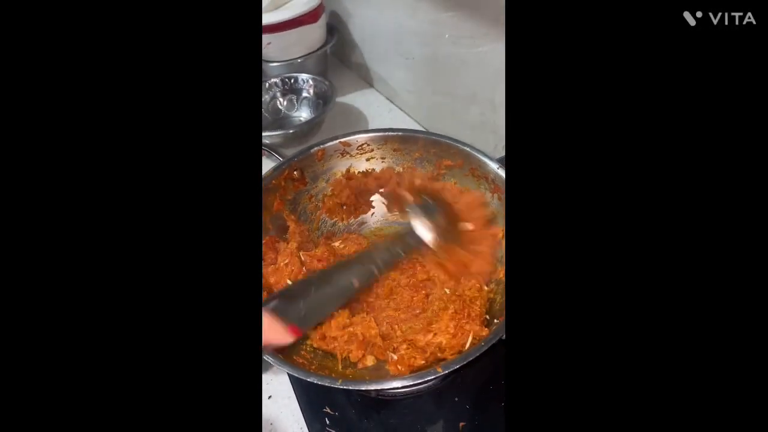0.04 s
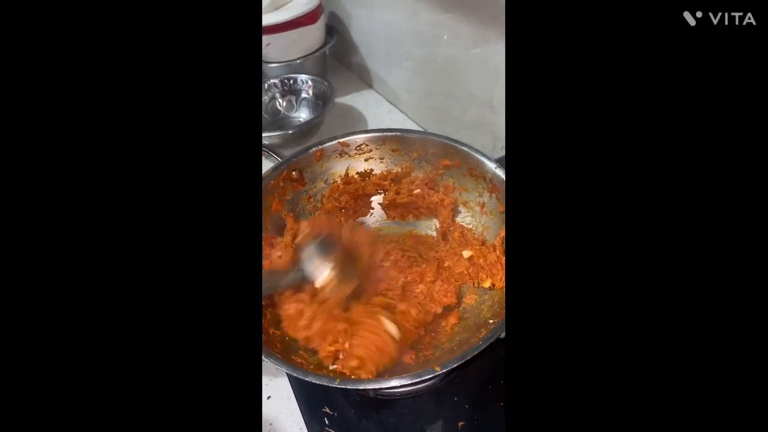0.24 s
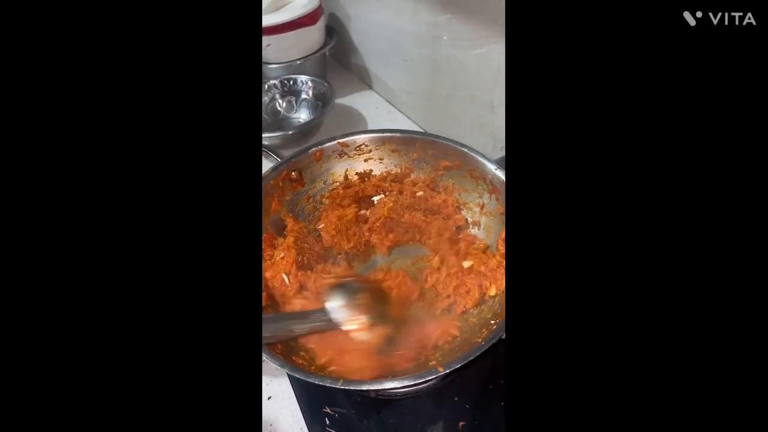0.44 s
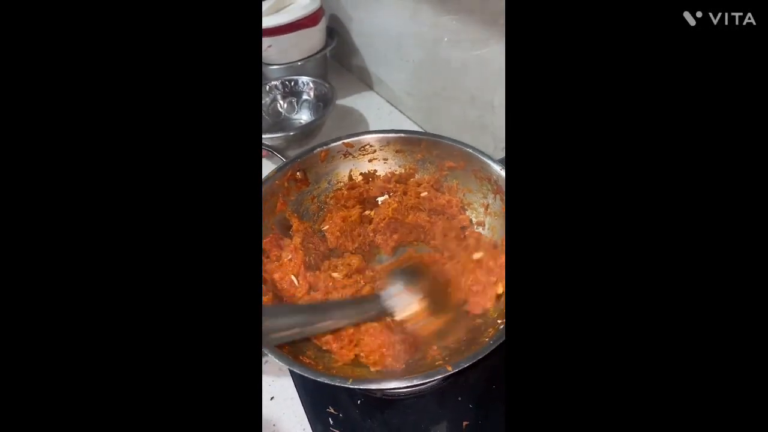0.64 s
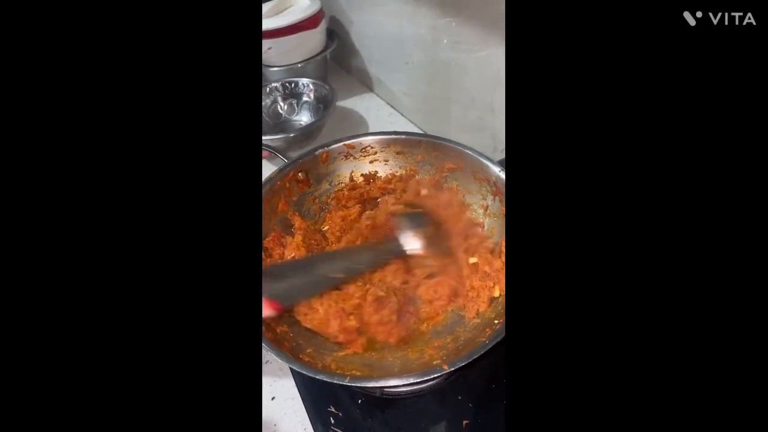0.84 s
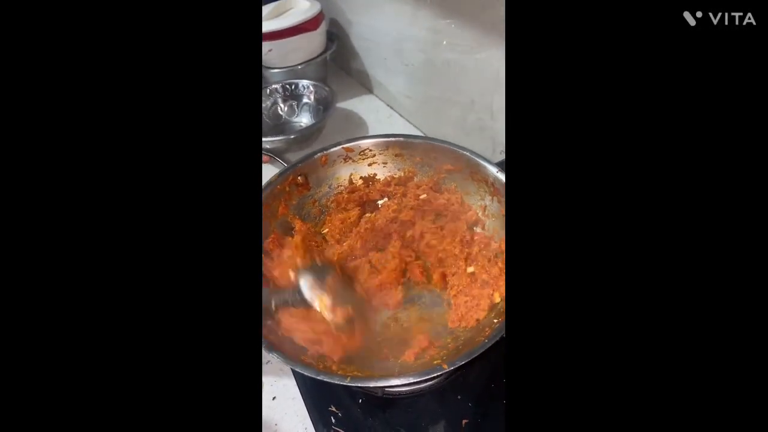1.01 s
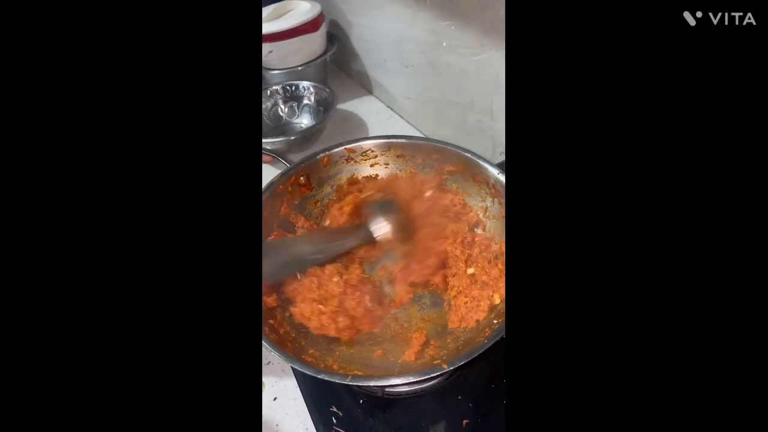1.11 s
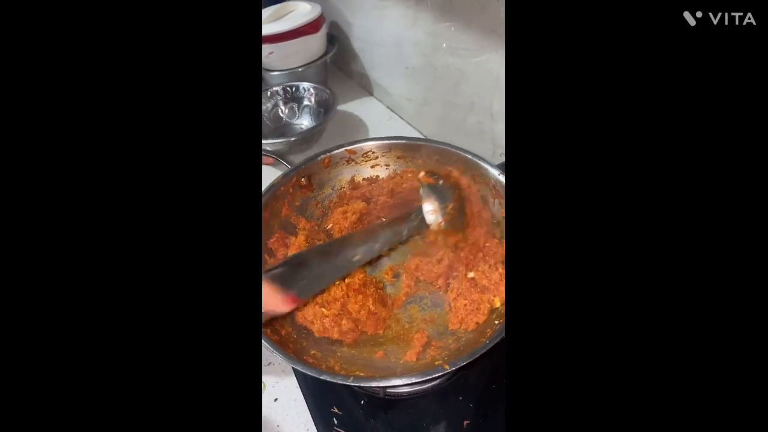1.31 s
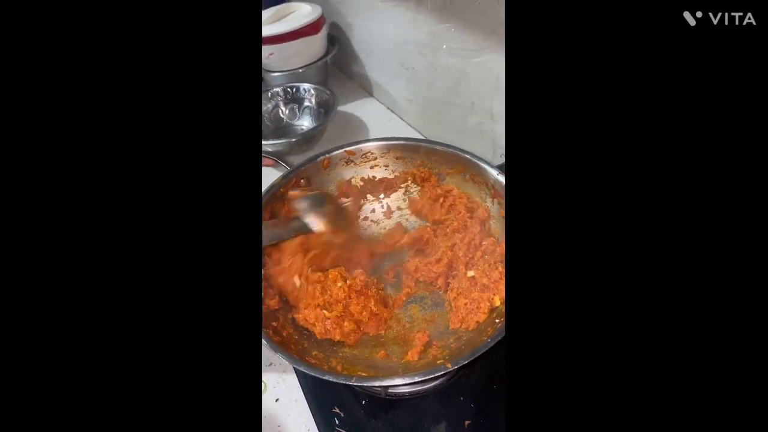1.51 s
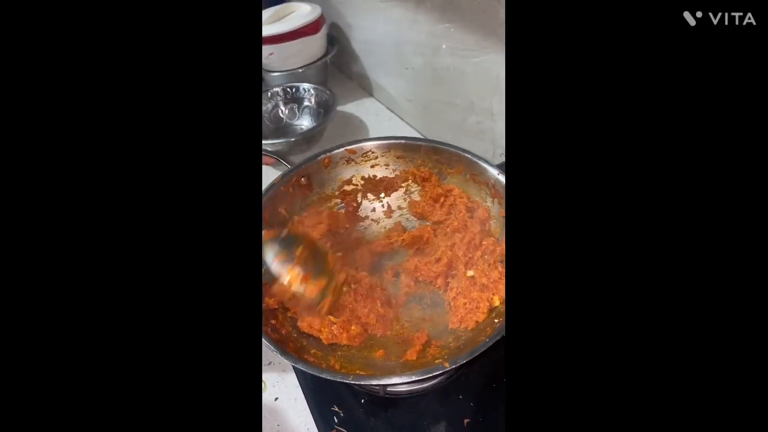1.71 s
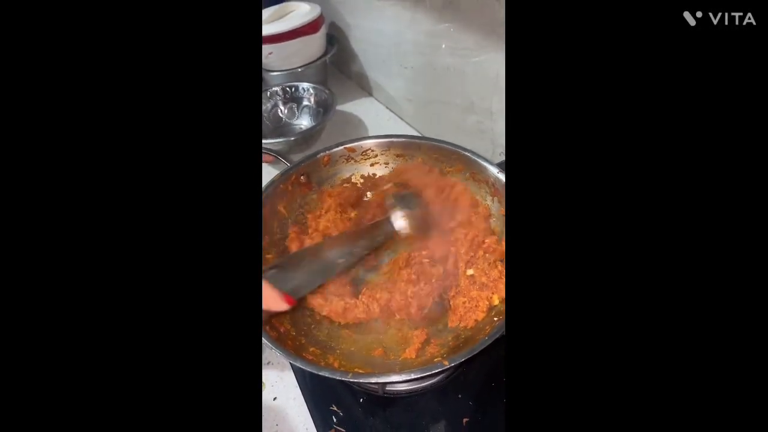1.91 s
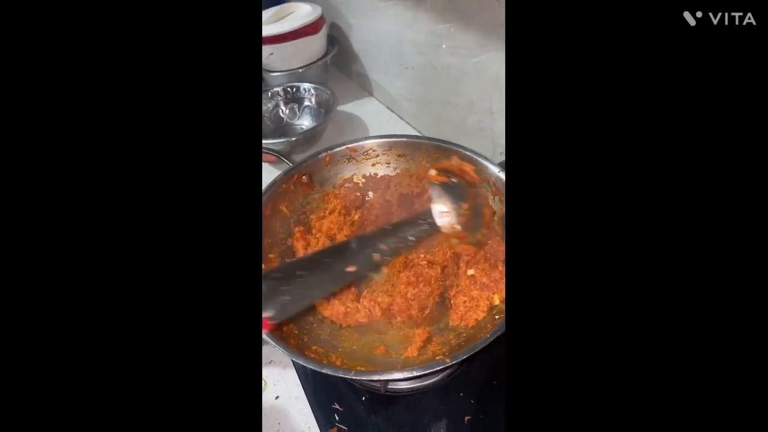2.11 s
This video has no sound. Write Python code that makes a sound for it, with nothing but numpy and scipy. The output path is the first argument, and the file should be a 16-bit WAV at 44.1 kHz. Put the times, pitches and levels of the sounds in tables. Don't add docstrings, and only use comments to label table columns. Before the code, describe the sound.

A metal ladle stirs thick food in a steel pan, close up in stereo: an early hard clank, uneven scrapes and soft drags, then another sharp knock near the end, over faint sizzling and low kitchen rumble.

```python
import sys
import numpy as np
from scipy import signal
from scipy.fft import rfft, irfft, next_fast_len
from scipy.io import wavfile
from scipy.ndimage import uniform_filter1d

SR = 44100
rng = np.random.default_rng(int(sys.argv[2]) if len(sys.argv) > 2 else 0)


def voltage_ratio(level):
    return 10 ** (np.asarray(level, float) / 20)


def output_pcm(signal):
    pcm = np.clip(np.atleast_2d(signal).T, -1, 1) * 32767
    wavfile.write(sys.argv[1], SR, np.round(pcm).astype(np.int16))


N = 94815


def evened(x):
    return x / np.sqrt(np.mean(x ** 2) + 1e-20)


def read(points, hz):
    f, value = np.transpose(points)
    return np.interp(np.log(hz + 1), np.log(f + 1), value)


def band(x, lo_hz, hi_hz):
    sos = signal.butter(3, [lo_hz, min(hi_hz, 20000)], "band", fs=SR, output="sos")
    return signal.sosfilt(sos, x)


def resonate(x, hz, width_hz):
    pole = np.exp((2j * hz - width_hz) * np.pi / SR)
    return signal.lfilter([1], [1, -pole], x)


def chatter(per_s, spread_db, lump_s, lump_db):
    slips = rng.standard_normal(N)
    slips *= voltage_ratio(spread_db * np.minimum(rng.exponential(1, N), 4))
    slips *= rng.random(N) < per_s / SR
    lumps = evened(uniform_filter1d(rng.standard_normal(N), round(lump_s * SR) + 1))
    return evened(slips * voltage_ratio(lump_db * lumps))


# time in seconds, level in dB.
RUMBLE = [(0, -46), (.12, -49.5), (.25, -41.5), (.45, -56.5), (.55, -40.5), (.75, -36.5), (.85, -44.5),
          (0.949, -46.5), (1.3, -55.5), (1.45, -42.5), (1.65, -57), (2.15, -50.5)]


def rumble():
    level = np.interp(np.arange(N) / SR, *np.transpose(RUMBLE))
    return voltage_ratio(level) * evened(band(rng.standard_normal((2, N)), 38, 127))


def fan():
    drone = resonate(rng.standard_normal((2, N)), 160, 4.7).real
    return voltage_ratio(-60) * evened(drone)


# frequency in Hz, level in dB per Hz.
SIZZLE = [(25, -7.5), (70, -5.5), (400, -20), (1800, -21.5), (3100, -18), (6300, -23.5), (9800, -14),
          (15500, -22.5)]


def sizzle():
    frames, hz = N // 256 + 5, np.fft.rfftfreq(1024, 1 / SR)
    a, b, c, d, patches = rng.standard_normal((frames, 513, 5)).T
    patches = evened(uniform_filter1d(uniform_filter1d(patches, 12, 0), 10, 1))
    color = voltage_ratio(read(SIZZLE, hz)[:, None] + 2.3 * patches)
    z = np.array([a + 1j * b, c + 1j * d]) * color
    hiss = evened(signal.istft(z, nperseg=1024, noverlap=768)[1][:, :N])

    pops = evened(band(chatter(900, 10.4, lump_s=0.011, lump_db=-3.0), 4500, 15000))
    pops = np.array([pops, np.roll(pops, 40)])

    r, w = np.exp(-np.pi * 25 / SR), 2 * np.pi * MODES_PAN[0][0] / SR
    hum = signal.lfilter([1, -1], [1, -2 * r * np.cos(w), r * r], rng.standard_normal((2, N)))
    return voltage_ratio(-41) * hiss + voltage_ratio(-74) * pops + voltage_ratio(-60) * evened(hum)


# start in seconds, fade in seconds, low edge in Hz, high edge in Hz.
SNAPS = [
    (.043, .004, 5000, 16000),
    (.2164, .003, 600, 9000),
    (.918, .003, 9000, 13000),
    (1.381, .004, 700, 13000),
    (1.72, .012, 450, 2300),
    (1.765, .003, 8000, 13000),
    (1.83, .004, 450, 2300),
    (2.022, .01, 500, 1000),
]
SNAP_DB = [-39, -18, -24, -29.5, -40, -35, -15.5, -37.5]


def snaps():
    out, t = np.zeros((2, N)), np.arange(3000) / SR
    noises = rng.standard_normal((len(SNAPS), 2, 3000))
    for (s, fade_s, lo_hz, hi_hz), db, noise in zip(SNAPS, SNAP_DB, noises):
        puff = evened(band(noise, lo_hz, hi_hz)) * np.exp(-t / fade_s)
        out[:, round(s * SR):][:, :3000] += voltage_ratio(db) * puff
    return out


# start in seconds, length in seconds, pitch in Hz.
CATCHES = [(.2164, .02, 750), (.2164, .006, 2130), (.2164, .008, 3330), (.251, .012, 5200),
           (.278, .006, 1800), (.288, .011, 1820), (.288, .009, 3100), (.335, .035, 3000),
           (.345, .022, 760), (.535, .02, 3650), (.549, .03, 2900), (.552, .022, 1700), (.59, .027, 1700),
           (.55, .05, 750), (.752, .035, 1800), (.81, .01, 3300), (.821, .004, 1900), (.829, .01, 1800),
           (.829, .007, 3200), (.844, .042, 3250), (.844, .016, 5100), (.844, .025, 1800),
           (1.053, .019, 3800), (1.078, .011, 2900), (1.088, .015, 3300), (1.075, .012, 1750),
           (1.091, .007, 1800), (1.058, .016, 1150), (1.476, .012, 1700), (1.72, .02, 620),
           (1.83, .012, 620), (1.83, .02, 5700), (1.838, .032, 3200), (1.87, .08, 3200),
           (.2164, .007, 1420), (.2164, .007, 1190), (.83, .009, 11300), (.843, .005, 11000),
           (.821, .003, 11000), (1.093, .004, 11500), (.288, .006, 11000), (1.21, .03, 290),
           (1.38, .008, 800), (.625, .04, 540), (1.414, .02, 800), (1.17, .02, 750), (.888, .03, 450)]
CATCH_DB = [-26.5, -21.5, -48, -34, -32, -26.5, -26.5, -34.5, -35.5, -33, -31, -33, -38.5, -39.5, -30.5,
            -23, -22, -19.5, -23, -27.5, -41, -42, -28.5, -21, -24, -38, -27, -29, -43, -40.5, -23, -36,
            -30, -46, -15, -18, -17, -22, -24, -23, -27, -36, -35, -30, -32, -40, -37]


def catches():
    out, t = np.zeros((2, N)), np.arange(6000) / SR
    noises = rng.standard_normal((len(CATCHES), 6000))
    for (s, length_s, hz), db, slips in zip(CATCHES, CATCH_DB, noises):
        bite = 7.3 * (t == 0)
        grip = (slips + bite) * voltage_ratio(-5.5 * t / length_s) * (t < length_s)
        width_hz = 49.6 + 0.067 * hz
        sing = resonate(resonate(grip, hz, width_hz), hz, 2 * width_hz)
        sing = voltage_ratio(db) * sing / np.sqrt(np.sum(abs(sing) ** 2) / (2 * length_s * SR))
        part = out[:, round(s * SR):][:, :6000]
        part += np.array([sing.real, sing.imag])[:, :part.shape[1]]
    return out


BOWL_HZ = 394
# frequency in Hz, level in dB, t60 in seconds.
MODES_PAN = [(292.2, 6.5, 0.2), (318.5, -2.5, 0.29), (599.5, -5, 0.13), (680, 3, 0.067), (768.3, -1, 0.13),
             (1232, -6, 0.11), (1415, -15.5, 0.052), (1764, -0.5, 0.017), (2890, 1, 0.046),
             (3269, -0.5, 0.11), (3860, -65, 0.062), (4900, -75, 0.0078), (8860, -20, 0.29),
             (10500, 11, 0.005)]
# frequency in Hz, level in dB per Hz.
SHEET = [(100, -41), (300, -12), (1500, -18.5), (2400, -18.5), (3200, -29.5), (5500, -15.5), (10800, -3.5),
         (15500, -26)]
# frequency in Hz, t60 in seconds.
SHEET_T60 = [(200, 0.4), (1500, 0.13), (10000, 0.041)]


def pan_ring():
    t = np.arange(8192) / SR
    clear = 0
    for hz, db, t60 in MODES_PAN:
        local = hz > BOWL_HZ
        level = voltage_ratio(db + 5.0 * rng.uniform(-1.16, 1) * local - 60 * t / t60)
        pitch = hz * (1 + rng.uniform(-.025, .025) * local)
        phase = rng.random((2, 1)) * [[0], [1]]
        clear = clear + level * np.sin(2 * np.pi * (pitch * t + phase))
    hz, s, z = signal.stft(rng.standard_normal((2, 8192)), SR, nperseg=128)
    decay = voltage_ratio(read(SHEET, hz)[:, None] - 60 * s / read(SHEET_T60, hz)[:, None])
    crowd = signal.istft(z * decay, SR, nperseg=128)[1][:, :8192]
    ring = (clear + voltage_ratio(25.0) * crowd) * (1 + 1.44 * np.exp(-t / 0.00066))
    return ring / np.linalg.norm(ring[0])


def stroke(start, hardest, end, db):
    t, edge_db, release_s = np.arange(N) / SR, -6.5, .035
    level = np.interp(t, [start, hardest, end, end + release_s], [edge_db, 0, edge_db, edge_db - 54.0])
    touching = (t >= start) * (t < end + release_s)
    return uniform_filter1d(voltage_ratio(db + level) * touching, size=150)


def strokes(slides, levels, column):
    return sum(stroke(*row, db[column]) for row, db in zip(slides, levels))


# start in seconds, soft thud in dB, clank in dB, edge tick in dB.
KNOCKS = [(0.02, -38.5, -31.5, -36), (0.042, -53, -32.5, -32.5), (0.12, -32, -34.5, -69),
          (0.199, -31, -21, -47), (0.2164, -8, -4.5, -22), (0.286, -54, -26, -52.5),
          (0.434, -33, -28.5, -40.5), (.501, -21.5, -26.5, -38), (0.609, -18, -30, -52),
          (0.743, -19, -19.5, -43), (0.81, -43, -22.5, -24), (0.92, -36, -43, -35), (1, -27.5, -26.5, -51),
          (1.204, -29, -33, -41), (1.369, -33.5, -63, -42), (1.381, -26.5, -27.5, -43),
          (1.413, -24.5, -36.5, -59), (1.475, -30, -31, -40.5), (1.495, -26.5, -31.5, -62),
          (1.72, -33.5, -41, -62), (1.765, -68, -64, -45), (1.83, -9, -10, -16), (1.84, -48, -23.5, -17),
          (2.023, -28, -48, -46)]
# start, hardest moment and end, all in seconds.
DRAGS = [(0, .01, .05), (.25, .27, .39), (.43, .445, .47), (.50, .515, .59), (.605, .64, .70),
         (.74, .76, .82), (.875, .90, .92), (1.0, 1.028, 1.05), (1.05, 1.07, 1.12), (1.16, 1.225, 1.245),
         (1.39, 1.42, 1.455), (1.47, 1.505, 1.52), (1.85, 1.865, 1.96), (2.02, 2.04, 2.12)]
# bowl in dB, wall in dB.
DRAG_DB = [(-38.5, -36), (-39.5, -33.5), (-45.5, -33.5), (-46, -30.5), (-26, -24.5), (-27.5, -23.5),
           (-32, -31), (-24.5, -29), (-31, -25.5), (-35, -38.5), (-31, -32), (-31, -46), (-38, -35.5),
           (-47, -64)]
# start, hardest moment and end, all in seconds.
SCRAPES = [(.24, .255, .285), (.28, .31, .36), (.515, .55, .58), (.575, .60, .67), (.74, .755, .81),
           (.785, .835, .885), (1.0, 1.015, 1.045), (1.046, 1.056, 1.082), (1.072, 1.094, 1.118),
           (1.83, 1.838, 1.87), (1.40, 1.44, 1.51), (1.11, 1.13, 1.23), (.828, .833, .838), (.66, .70, .74),
           (.89, .93, 1.0)]
# clank in dB, edge in dB.
SCRAPE_DB = [(-20, -25.5), (-27, -26), (-31, -34.5), (-27, -33), (-24.5, -36), (-22.5, -27.5), (-29.5, -41),
             (-20.5, -25), (-20, -28.5), (-25.5, -26.5), (-43.5, -56), (-42, -47.5), (-24, -14.5),
             (-37, -43), (-38.5, -38.5)]


def ladle():
    soft, clank, edge = np.zeros((3, N))
    touches = rng.standard_normal((len(KNOCKS), 400)) * np.exp(-np.arange(400) / SR / .0009)
    touches[:, 0] += 5
    for (s, soft_db, clank_db, edge_db), flurry in zip(KNOCKS, touches):
        at = round(s * SR)
        flurry = flurry / np.linalg.norm(flurry)
        soft[at] += voltage_ratio(soft_db + 23.5)
        clank[at:at + 400] += voltage_ratio(clank_db + 29.5) * flurry
        edge[at:at + 400] += voltage_ratio(edge_db + 29.5) * flurry

    lumps = voltage_ratio(2.0) * chatter(2500, 6.1, lump_s=0.0032, lump_db=2.0)
    bowl = lumps * strokes(DRAGS, DRAG_DB, 0)
    wall = lumps * strokes(DRAGS, DRAG_DB, 1)

    slips = chatter(20000, 2.0, lump_s=.003, lump_db=2.0)
    hard = voltage_ratio(8.5) * slips * strokes(SCRAPES, SCRAPE_DB, 0)
    edge += voltage_ratio(4.5) * slips * strokes(SCRAPES, SCRAPE_DB, 1)

    push = band(soft, 251, 850) + band(clank, 685, 3270)
    push += band(bowl, 233.5, BOWL_HZ) + band(wall, BOWL_HZ, 1666)
    push += band(hard, 1450, 5000) + band(edge, 5000, 17000) + 0.089 * band(edge, 1900, 5000)

    spot = np.arange(N) / SR / .037
    out = np.zeros((2, N))
    for k in range(6):
        share = np.cos(np.pi / 2 * np.minimum(abs((spot - k + 3) % 6 - 3), 1))
        out += signal.fftconvolve((push * share)[None], pan_ring(), axes=1)[:, :N]
    return out


def scene():
    return ladle() + sizzle() + rumble() + fan() + catches() + snaps()


def drop_masked(pair):
    hz, _, z = signal.stft([pair[0] + pair[1], pair[0] - pair[1]], SR, nperseg=1024)
    hz = hz[:512, None]
    power = (abs(z[:, :512]) ** 2).reshape(2, 64, 8, -1).sum(axis=2)
    power = uniform_filter1d(np.repeat(power, 8, axis=1), size=3, axis=2)
    weaker_db = -9 - 2 * (hz < 7000)
    keep = (power > voltage_ratio(2 * weaker_db) * power[::-1]) | (hz < 2200)
    keep &= (power > voltage_ratio(2 * -36.5) * power.sum(axis=(0, 1)) / 8) | (hz < 12800)
    z = z * np.pad(keep, ((0, 0), (0, 1), (0, 0)))
    mid, side = signal.istft(z, SR, nperseg=1024)[1][:, :N]
    return np.array([mid + side, mid - side]) / 2


# frequency in Hz, lead of the right port in radians.
LEAD = [(1600, 0), (2500, -3.1), (3400, -3.6), (3800, -6.3), (5400, -8), (8250, -3.14), (11050, 0),
        (15700, 5.6)]
# frequency in Hz, shared part from 0 to 1.
SAME = [(100, .85), (600, .8), (1000, .4), (2200, .55), (5800, .5), (8000, .86), (11000, .96), (15000, .95)]
# frequency in Hz, left over right in dB.
TILT = [(60, -2), (300, -4), (1000, 0), (1700, -4), (3300, 3.5), (5500, 1), (8000, 0)]


def top_cut(x):
    return signal.sosfilt(signal.butter(12, 17160, fs=SR, output="sos"), x)


def record(dry):
    size, limit = next_fast_len(N + 4096), 1.1
    hz = np.fft.rfftfreq(size, 1 / SR)
    left, own = rfft(limit * np.tanh(dry / limit), size)
    same = np.clip(read(SAME, hz), 0, 1)
    turn = np.exp(1j * np.interp(hz, *np.transpose(LEAD)))
    right = same * left * turn + np.sqrt(1 - same ** 2) * own
    tilt = read(TILT, hz) / 2
    low_cut, high_cut = hz ** 2 / (hz ** 2 + 30 ** 2), 1 / (1 + (hz / 15950) ** 120)
    pair = np.array([left * voltage_ratio(tilt), right * voltage_ratio(-tilt)]) * low_cut * high_cut
    mix = drop_masked(irfft(pair, size)[:, :N])
    return top_cut(mix)


dry = scene()
out = record(dry)
output_pcm(out)
```